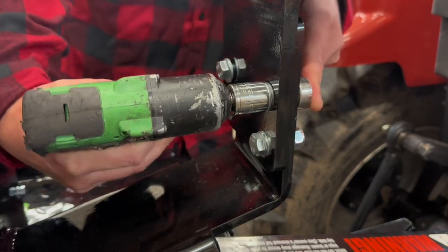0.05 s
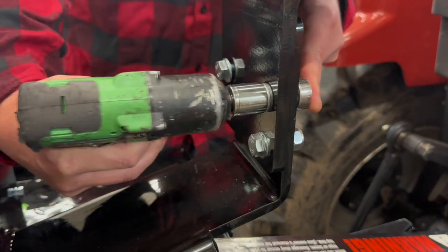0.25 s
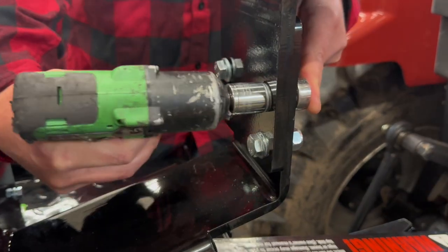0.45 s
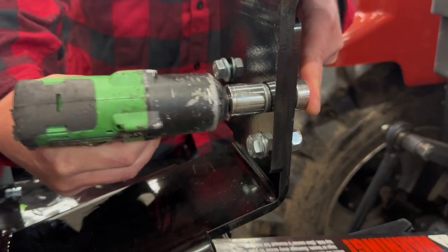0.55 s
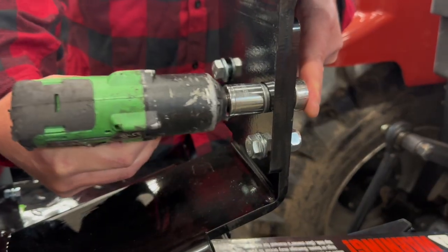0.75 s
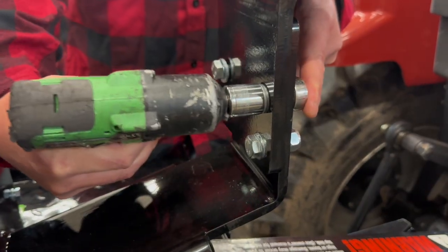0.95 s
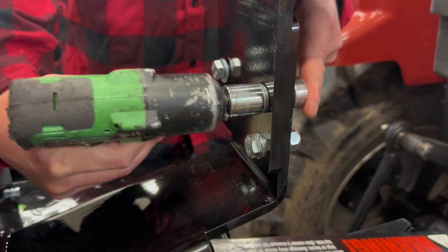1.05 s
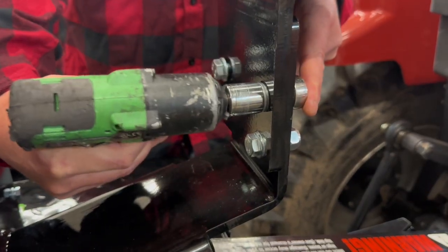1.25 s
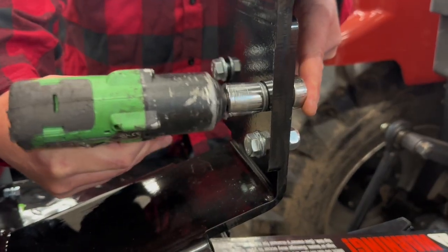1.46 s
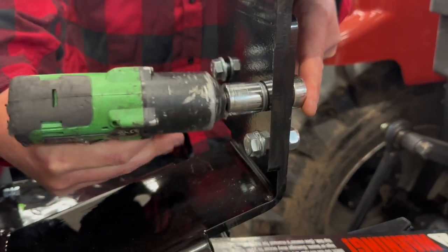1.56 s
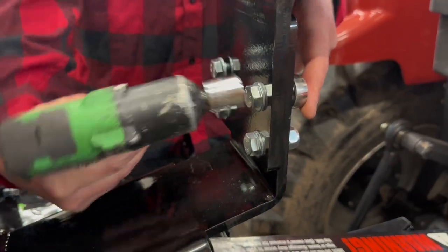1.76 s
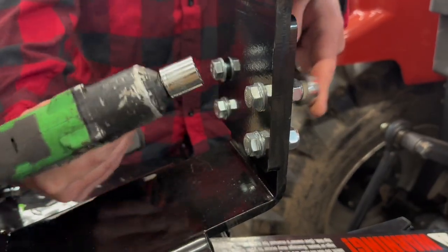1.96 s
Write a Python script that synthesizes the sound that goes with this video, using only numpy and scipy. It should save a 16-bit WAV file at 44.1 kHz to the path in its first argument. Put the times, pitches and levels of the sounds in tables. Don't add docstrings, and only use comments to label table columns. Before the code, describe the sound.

Close, distorted clatter of an impact wrench tightening a bolt: a faint touch, one sustained burst of rapid metallic cracks with whirring motor and ringing bracket, then a sudden stop, low knock and fading reverberant clang.

```python
import sys
import numpy as np
from scipy import signal
from scipy.io import wavfile

SR = 44100
rng = np.random.default_rng(int(sys.argv[2]) if len(sys.argv) > 2 else 0)


def wav_record(signal):
    frames = np.transpose(np.atleast_2d(signal))
    bounded = np.clip(frames, -1, 1)
    quanta = np.round(bounded * 32767).astype(np.int16)
    wavfile.write(sys.argv[1], SR, quanta)


def decibels_to_gain(level_db):
    exponent = np.asarray(level_db, float) / 20
    return 10 ** exponent


N = 88200
T = np.arange(N) / SR


def evened(x):
    return x / np.sqrt(np.mean(x ** 2) + 1e-20)


def read(points, hz):
    f, value = np.transpose(points)
    return np.interp(np.log(hz + 1), np.log(f + 1), value)


def colour(x, points):
    log_gain = read(points, abs(np.fft.fftfreq(4096, 1 / SR))) * np.log(10) / 20
    taps = np.fft.ifft(np.exp(np.conj(signal.hilbert(log_gain)))).real[:2048]
    return signal.oaconvolve(x, taps)[:len(x)]


# (frequency [Hz], density [dB per Hz])
ROOM_SPECTRUM = [(20, -3.5), (65, -1.5), (150, -14.5), (480, -8), (700, -17), (2100, -13), (2600, -24),
                 (16000, -42.5)]


def room_floor():
    return decibels_to_gain(-76) * evened(colour(rng.standard_normal(N), ROOM_SPECTRUM))


# (time [s], level [dB])
GRIP_LEVEL = [(.21, -82), (.28, -70), (1.0, -64), (1.4, -35), (1.7, -36), (1.78, -57), (1.85, -72),
              (2.0, -73)]
# (frequency [Hz], density [dB per Hz])
RUMBLE_SPECTRUM = [(20, -0.5), (60, -8.5), (150, -16.5), (400, -20.5), (2000, -65)]


def rumble():
    s, db = np.transpose(GRIP_LEVEL)
    return decibels_to_gain(np.interp(T, s, db)) * evened(colour(rng.standard_normal(N), RUMBLE_SPECTRUM))


# (time [s], level [dB], pitch [Hz], t60 [s])
FRAME_KNOCKS = [
    (.128, -74, 484, .2),
    (.125, -82, 2090, .15),
    (1.693, -18, 318, .2),
]


def knocks():
    out = np.zeros(N)
    rise_s = 0.0043
    for s, db, hz, t60 in FRAME_KNOCKS:
        t = np.maximum(T - s, 0)
        ring = np.minimum(t / rise_s, 1) * np.sin(2 * np.pi * hz * t)
        out += decibels_to_gain(db - 60 * t / t60) * ring
    return out


# (time [s], force [dB], then coupling into
# frame [dB], flange [dB], socket [dB], plate [dB], bolt [dB])
SEATING = [(.22, -10.5, -1, 10, -0.5, 8.5, -9.5), (.25, -7.5, -11, 6.5, 16, 18, -16),
           (0.261, 1.5, -4, -4, 5.5, 3.5, -17), (.4, 3, 1, -29, -2.5, -1, -16),
           (.7, 3.5, 0, -5.5, -2, 0, 5), (1.0, 3.5, -4, -1, -3, -1.5, -1),
           (1.15, 4, -0.5, 8, -3.5, -1.5, 3.5), (1.399, 6, 0, 7, -9, -3, 6.5),
           (1.52, 1.5, -6, 10, -7, 0, 6), (1.62, -0.5, -6.5, 7, -16, -11, 9),
           (1.7, -5.5, -20, 8.5, -16.5, -11, 6)]


def seat(part):
    rows = np.array(SEATING)
    column = ("time", "force", "frame", "flange", "socket", "plate", "bolt").index(part)
    return decibels_to_gain(np.interp(T, rows[:, 0], rows[:, column]))


def running():
    start_s, spin_s, stop_s, brake_s = 0.2127, 0.0068, 1.705, 0.0087
    spin_up = np.clip((T - start_s) / spin_s, 0, 1) ** 2
    return spin_up * np.exp(-np.maximum(T - stop_s, 0) / brake_s)


# (frequency [Hz], density [dB])
WHIR_SPECTRUM = [(100, -38), (500, -14), (2000, 5.5), (5000, -1.5), (9000, -13), (15000, -17.5)]


def motor():
    whir = evened(colour(rng.standard_normal(N), WHIR_SPECTRUM))
    return decibels_to_gain(-17.5) * running() * seat("force") * whir


# (blow [number], time [s])
BLOW_TIMES = [(0, .226), (1, .258), (4, .329), (10, .462), (20, .683), (30, .901), (40, 1.119), (50, 1.33),
              (60, 1.538), (64, 1.622), (67, 1.691)]
# (low edge [Hz], high edge [Hz])
RATTLE_BANDS = [(60, 1500), (1500, 4000), (4000, 7000), (7000, 11000), (11000, 20000)]


def blows():
    rise_s, hold_s, fall_s = 0.00094, 0.0061, 0.0019
    jitter_s, smear_s = 0.00091, 0.002
    blow_spread_db, colour_spread_db, push_db = 1.2, 1.6, -2
    number, s = np.transpose(BLOW_TIMES)
    count = int(number[-1]) + 1
    due = np.interp(np.arange(count), number, s)
    chance = rng.standard_normal((count, 12))
    at = due + jitter_s * chance[:, 0] * (np.arange(count) > 1)
    t = T[:SR // 20]
    contact = np.minimum(t / rise_s, 1) * np.exp(-np.maximum(t - hold_s, 0) / fall_s)
    rattle = np.zeros(N)
    for k, (lo, hi) in enumerate(RATTLE_BANDS):
        train = np.zeros(N)
        late = smear_s * abs(chance[:, 7 + k]) / 2
        strength_db = blow_spread_db * chance[:, 1] + colour_spread_db * chance[:, 2 + k]
        train[((at + late) * SR).astype(int)] = decibels_to_gain(strength_db)
        band = signal.butter(2, [lo, hi], "band", fs=SR, output="sos")
        hiss = signal.sosfilt(band, rng.standard_normal(N))
        rattle += signal.oaconvolve(train, contact)[:N] * hiss
    push = np.zeros(N)
    push[(due * SR).astype(int)] = 1
    return evened(rattle), decibels_to_gain(push_db) * evened(push)


def chatter():
    ticks_per_s, spread_db = 1800, 0.5
    size = decibels_to_gain(spread_db * np.minimum(rng.exponential(1, N), 5)) * rng.choice([-1., 1.], N)
    ticks = size * (rng.random(N) < ticks_per_s / SR)
    return decibels_to_gain(-12) * running() * evened(ticks)


# (frequency [Hz], density [dB per Hz])
CRACK_SPECTRUM = [(100, -60.5), (500, -2.5), (1500, 2.5), (3500, 4.5), (6000, -2), (8500, -10.5),
                  (12000, -12), (15500, -11.5)]


def crack(force):
    return decibels_to_gain(-14.5) * evened(colour(force, CRACK_SPECTRUM))


def ring_out(x, t60s):
    hz, t, z = signal.stft(rng.standard_normal(SR), SR, nperseg=256)
    decay = decibels_to_gain(-60 * t / read(t60s, hz)[:, None])
    tail = signal.istft(z * decay, SR, nperseg=256)[1]
    return signal.fftconvolve(x, tail / np.linalg.norm(tail))[:N]


def wander(x, t60s, turns_per_s):
    turn = 2 * np.pi * turns_per_s * T
    tails = [ring_out(x * np.cos(turn + k * np.pi / 3), t60s) for k in range(3)]
    return sum(tails) / np.sqrt(1.5)


# (frequency [Hz], density [dB per Hz])
PLATE_SPECTRUM = [(25, -15.5), (150, -33), (300, -10), (750, -2.5), (1200, -0.5), (2500, -8.5), (5000, -8),
                  (12000, -24)]
# (frequency [Hz], t60 [s])
PLATE_DECAY = [(60, 0.13), (300, 0.14), (1000, 0.16), (3000, 0.066), (8000, 0.032), (15000, 0.026)]


def plate(force):
    ring = wander(force * seat("plate"), PLATE_DECAY, turns_per_s=2.706)
    return decibels_to_gain(-14.5) * evened(colour(ring, PLATE_SPECTRUM))


def modes(x, hzs, table):
    t = T[:SR // 2]
    shape = np.zeros(len(t))
    for k, (db, t60) in enumerate(table):
        sine = np.sin(2 * np.pi * hzs[k] * t) / np.sqrt(t60)
        shape += (-1) ** k * decibels_to_gain(db - 60 * t / t60) * sine
    return evened(signal.fftconvolve(x, shape)[:N])


FRAME_PITCH = [228, 272, 314, 455, 482]
# (level [dB], t60 [s])
FRAME_RING = [(-3, .17), (-12, .12), (1, .16), (-5, .17), (-1, .25)]


def frame(force, push):
    return decibels_to_gain(-18) * modes((force + push) * seat("frame"), FRAME_PITCH, FRAME_RING)


FLANGE_PITCH = [958, 1015, 1062, 1092, 1140, 1165, 1290, 1318, 1345, 1385, 1412, 1555, 1706]
# (level [dB], t60 [s])
FLANGE_RING = [(-4, .15), (-4, .3), (-4, .45), (-4, .5), (-7, .45), (-7, .45), (-4, .4), (2, .6), (0, .45),
               (-2, .45), (-5, .55), (-6, .15), (-6, .22)]


def flange(force, push):
    return decibels_to_gain(-16) * modes((force + 0.6 * push) * seat("flange"), FLANGE_PITCH, FLANGE_RING)


BOLT_PITCH = [2900, 3003, 4267]
# (level [dB], t60 [s])
BOLT_RING = [(2, .13), (-3, .13), (0, .15)]


def bolt(force):
    return decibels_to_gain(-23) * modes(force * seat("bolt"), BOLT_PITCH, BOLT_RING)


SOCKET_PITCH = [760, 980, 1360, 1800, 2115, 2185, 3550, 5690]
# (level [dB], t60 [s])
SOCKET_RING = [(-13, 0.09), (-1, 0.14), (3.5, 0.061), (-8.5, 0.038), (1.5, 0.2), (-4, 0.14), (-3.5, 0.027),
               (-8.5, .06)]


def socket(force):
    return decibels_to_gain(-17.5) * modes(force * seat("socket"), SOCKET_PITCH, SOCKET_RING)


def bracket(force, push):
    ringing = frame(force, push) + flange(force, push) + bolt(force) + socket(force)
    return crack(force) + plate(force) + ringing


# (frequency [Hz], t60 [s])
SHOP_DECAY = [(100, 0.77), (500, 1.03), (1200, 1.4), (4000, 0.76), (7300, .8), (8500, 0.44)]


def workshop(near):
    return decibels_to_gain(-25.5) * wander(near, SHOP_DECAY, turns_per_s=5.3)


def scene():
    rattle, push = blows()
    force = (rattle + chatter()) * seat("force")
    near = bracket(force, push * seat("force")) + motor() + knocks()
    near_low_hz = 165
    near = signal.lfilter(*signal.butter(2, near_low_hz, "high", fs=SR), near)
    return (near + workshop(near) + room_floor() + rumble())[None]


def roll_off(x):
    return signal.sosfilt(signal.butter(12, 16470, fs=SR, output="sos"), x)


def record(dry):
    drive_db, ceiling, knee, edge_hz = 0.5, 0.76, 2.06, 15750
    x = dry * decibels_to_gain(drive_db)
    x = x / (1 + abs(x / ceiling) ** knee) ** (1 / knee)
    low_pass = signal.firwin(511, edge_hz, window=("kaiser", 9), fs=SR)
    mix = signal.oaconvolve(x, low_pass[None], "same")
    return roll_off(mix)


dry = scene()
out = record(dry)
wav_record(out)
```